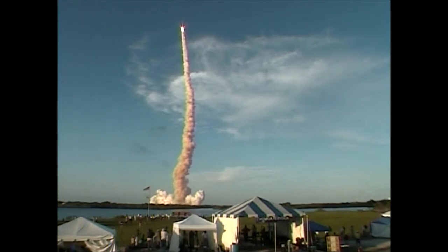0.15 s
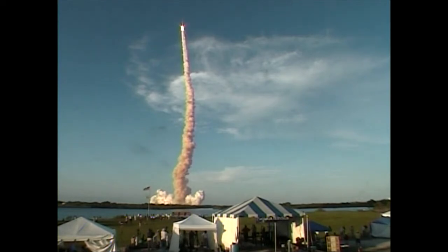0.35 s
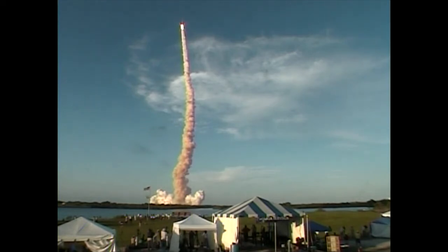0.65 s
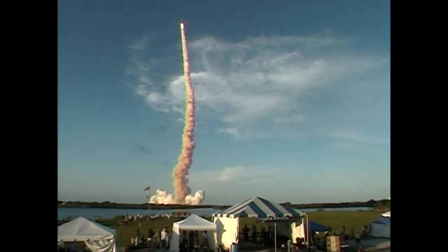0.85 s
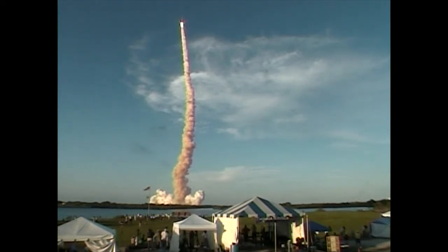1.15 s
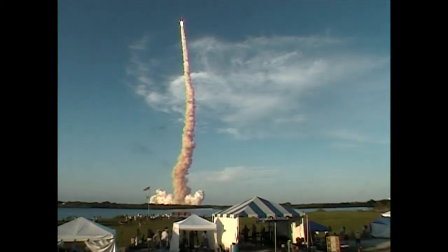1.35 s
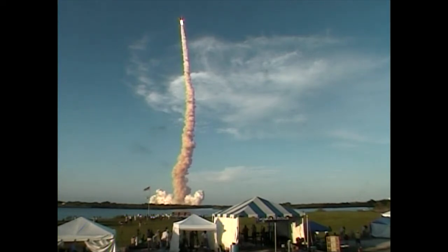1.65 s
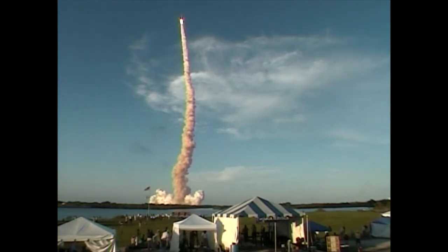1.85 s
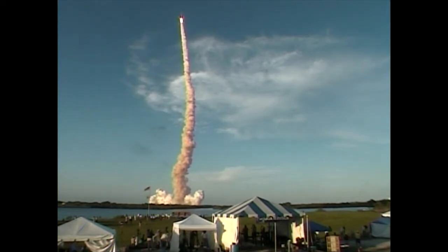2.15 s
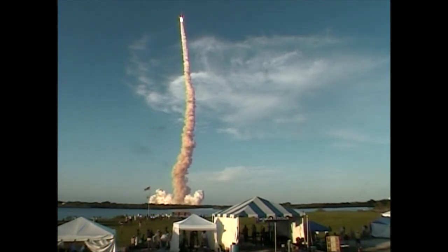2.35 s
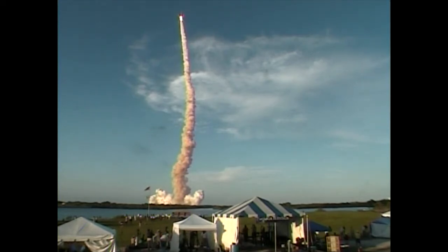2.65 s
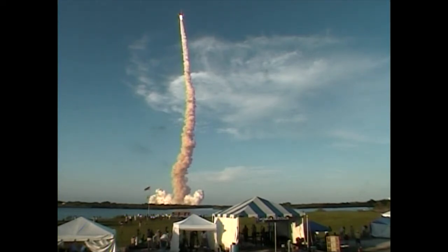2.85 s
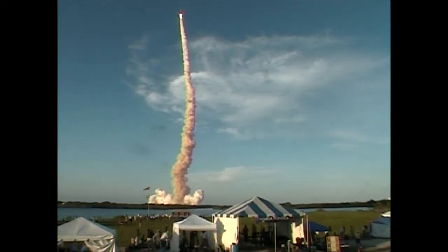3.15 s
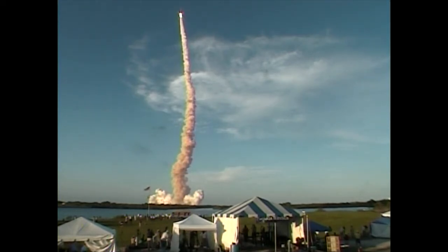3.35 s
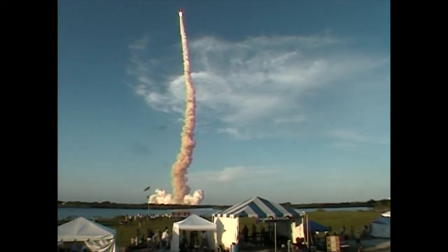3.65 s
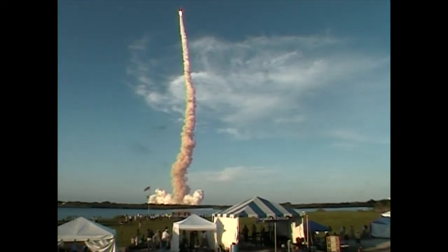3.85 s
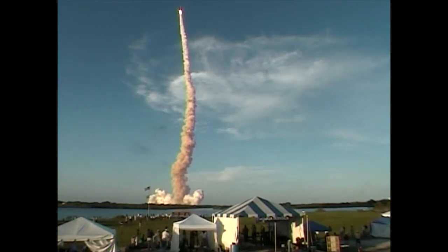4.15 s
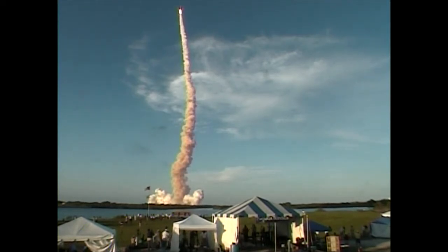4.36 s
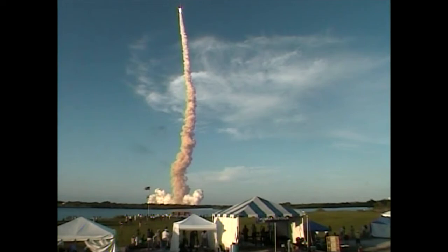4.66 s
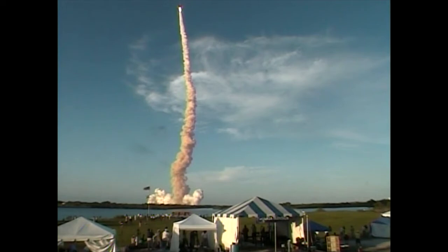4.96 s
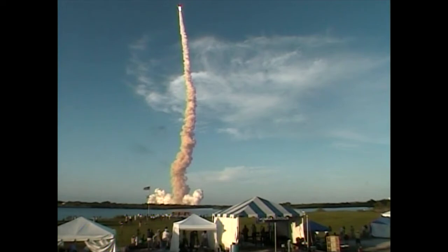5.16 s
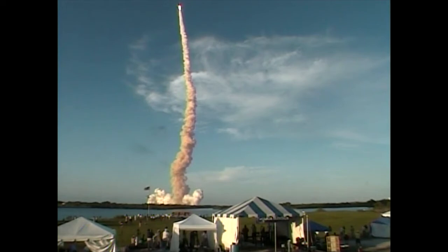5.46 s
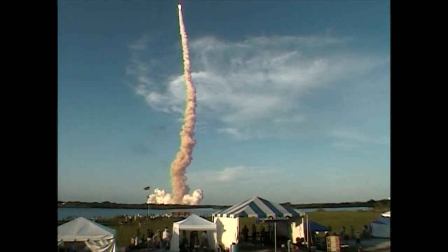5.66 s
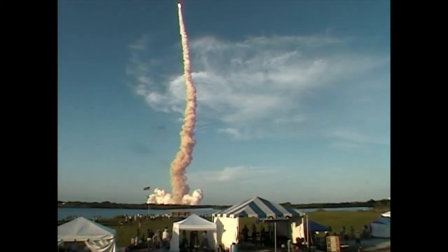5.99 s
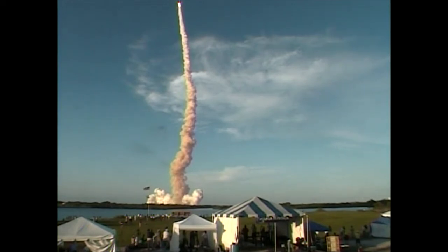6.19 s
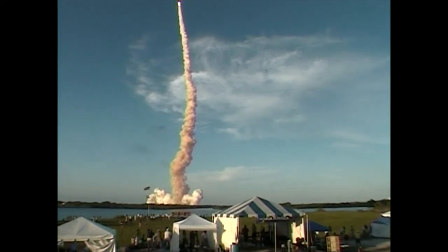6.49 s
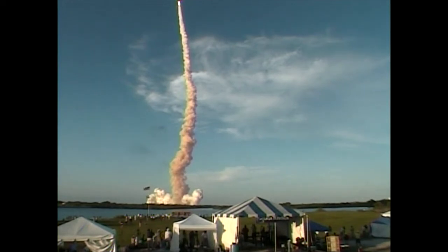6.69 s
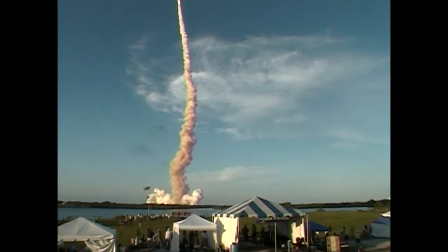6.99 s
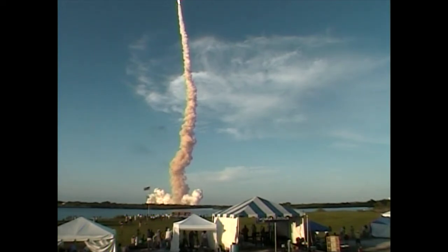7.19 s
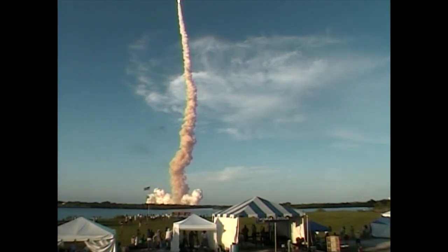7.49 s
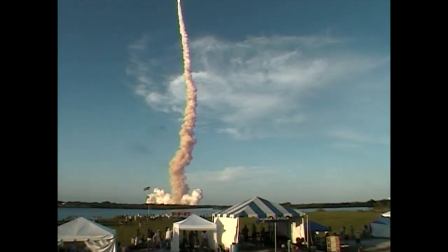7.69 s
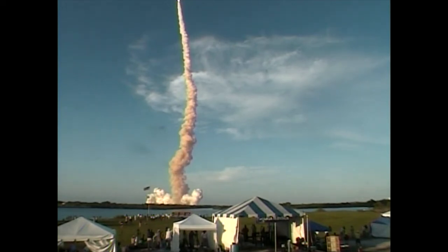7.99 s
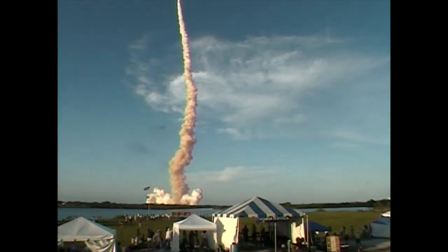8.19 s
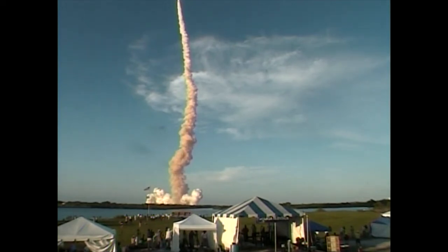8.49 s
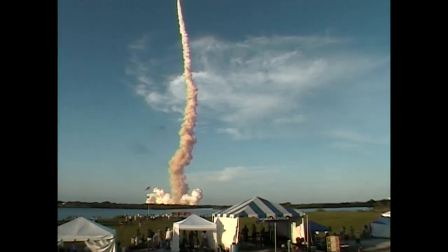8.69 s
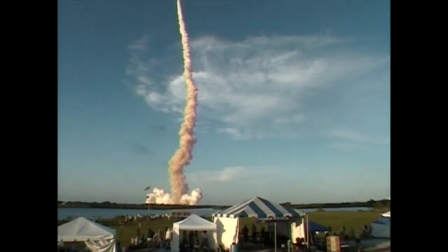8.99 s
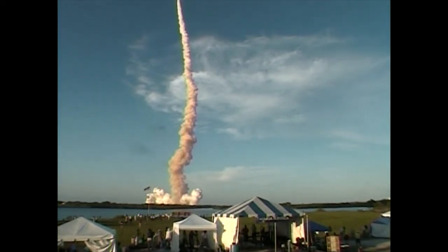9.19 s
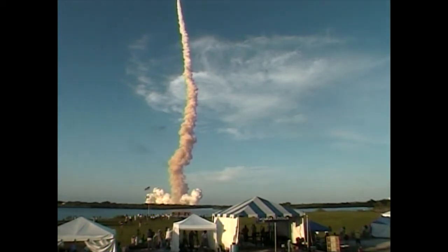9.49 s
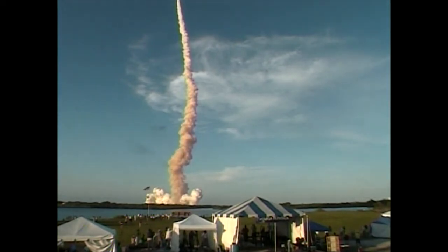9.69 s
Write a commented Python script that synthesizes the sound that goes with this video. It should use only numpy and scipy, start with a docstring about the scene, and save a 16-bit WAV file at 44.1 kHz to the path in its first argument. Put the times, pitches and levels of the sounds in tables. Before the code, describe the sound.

A distant rocket climbing: one hard opening crack, then nonstop ragged tearing crackle over soft roar and low rumble, densest near three and a half seconds.

```python
"""A hard crack comes first, then a torn crackle over a soft roar and a low rumble: a rocket climbs miles away.
The exhaust sends shock fronts, made here as pressure jumps that snap back; its roar and rumble are
coloured noise. Echoes with sliding delays and a short scattered tail, as from tents and people, follow.
The camera's microphone flattens the tallest peaks; a thin whine, a faint whirr and hiss lie underneath,
and a high noisy fizz swells with bright, loud sound and lingers."""
import sys
import numpy as np
from scipy import signal
from scipy.fft import rfft, irfft, next_fast_len
from scipy.io import wavfile
from scipy.ndimage import uniform_filter1d

SR = 44100
rng = np.random.default_rng(int(sys.argv[2]) if len(sys.argv) > 2 else 0)


def unload_wav(signal):
    """Save mono or channel-first audio to the path in sys.argv[1] as 16-bit WAV at rate SR, clipped to [-1, 1]."""
    wavfile.write(
        sys.argv[1],
        SR,
        np.round(np.clip(np.atleast_2d(signal).T, -1, 1) * 32767).astype(np.int16),
    )


N = 433944
TIME = np.arange(N) / SR

# the cracks that stand out: [t/s, pressure level/dB, steepness as treble/dB, strength of the tail/dB]
CRACKS = [(0.012, -4.5, 3.5, 4), (0.0736, -6.5, -1, 2.5), (0.0783, -10, 0, -9), (0.143, -6, -3.5, 1.5),
          (0.205, -13, -2, 5), (0.286, -17, -0.5, 1), (0.369, -17, -2.5, 8), (0.377, -10, -5, -4),
          (0.45, -8.5, 3, 2.0), (0.5211, -9, -0.5, -0.5), (0.548, -14.5, 3, 4.5), (0.5964, -10.5, 1.5, 3),
          (0.628, -10.5, 6, 4.5), (0.7187, -11.5, 2.5, 3.5), (0.768, -14.5, -1.5, 0), (0.802, -5.5, 3, 2.5),
          (0.874, -8.0, 2.5, 4), (0.941, -9, 1.5, 4), (1.0784, -16.0, -2, 5), (1.17, -12.5, -4.5, 0),
          (1.2134, -12, -1.5, 1.5), (1.284, -15.5, 0, 6), (1.3816, -3.5, 1.5, 0.5), (1.449, -12, -8, 4),
          (1.6454, -12, -7, 0), (1.6794, -11, -2, 4.5), (1.7554, -7.5, -0.5, 4), (1.8069, -16.5, -0.5, 9),
          (1.9398, -11.5, -8.5, -1.5), (1.9509, -10.5, 0, -1), (2.0368, -15, -0.5, 5.5),
          (2.173, -12.5, 0.5, 7), (2.223, -9.5, 0.5, 4.5), (2.2978, -8, 0.5, -0.5), (2.3475, -15.5, 3, 2.5),
          (2.4265, -7, 3.0, -2), (2.5629, -9, 1.5, -3), (2.6023, -17, 1, 2), (2.637, -8.5, 5, -4.5),
          (2.6981, -8.0, 4, 1.5), (2.716, -9.5, 4, -10), (2.7198, -13, 5, -11), (2.751, -6.5, 4.5, 2),
          (2.835, -8.5, -2.5, 1), (2.8678, -15, 0, 2.5), (2.899, -5.5, 2, -4), (2.9513, -13, 2, 0),
          (2.9856, -4.5, 4, -5.5), (3.0122, -6.5, 2.5, -7), (3.0723, -9.5, 1.5, 3),
          (3.116, -8.5, 0.5, -0.5), (3.1627, -6.5, 4, -2), (3.1933, -10, -7, -9), (3.2146, -4.5, 1, -1),
          (3.2387, -4.5, 1, -4), (3.265, -4.5, 2.5, -7), (3.322, -4, 1, -0.5), (3.374, -3.5, 3, -2),
          (3.3886, -6.5, 1.5, -4), (3.416, -3, 5.5, 4), (3.4668, -15, 5, -2), (3.489, -4.5, 3.5, -1),
          (3.5083, -2, 5, 1), (3.544, -8, 7, 1.5), (3.5756, -7.5, 9.5, 3.5), (3.6283, -7, 8, 3),
          (3.675, -3, 2.5, 2.5), (3.6925, -9, 7.5, 1.5), (3.761, -1.5, 5.5, 4.5), (3.798, -12, 10, 1.5),
          (3.819, 0, 2.5, 5), (3.8665, -9, 0.5, 4), (3.911, -6, 4.5, 4), (3.932, -6, -5.5, 2.5),
          (3.9703, -10.5, 2, 5.5), (4.0548, -10.5, -4, -2), (4.0837, -7.5, -5, 3.5), (4.1648, -4.5, 3.5, 1),
          (4.207, -12.5, -2, 3), (4.265, -6.5, 4.5, 6), (4.3335, -5.5, 5, 2), (4.409, -15, 1, 1),
          (4.431, -15.5, -1, 8), (4.462, -7, 5, -1.5), (4.515, -14.0, 0.5, 3.5), (4.5655, -13.5, 0.5, 5.5),
          (4.614, -10, 3, 5), (4.67, -13, -1.5, 6.5), (4.7426, -6.5, 4, 1), (4.7916, -11.5, 2, 1),
          (4.816, -14, 2.5, 5), (4.8953, -11.5, 1, 3), (4.9402, -12.5, -1, -1), (5.0147, -7.5, 4, 3),
          (5.121, -12.5, -1.5, 3), (5.2036, -6, 1, 1), (5.3085, -12.0, 0, 1.5), (5.3364, -9.5, -0.5, 5),
          (5.395, -10.5, -2, 3), (5.4643, -14, -5, 6.5), (5.5296, -14.5, -6.5, 4), (5.6719, -8, -5.5, -1),
          (5.745, -7, -5, 2.5), (5.794, -4.5, -2, 3.5), (5.8593, -5.5, -3.5, 2), (5.9238, -11.5, -6, 2.5),
          (6.015, -8.5, -7, 4), (6.072, -5.5, -2, -0.5), (6.118, -4.5, -3, 0.5), (6.2069, -11, -5, 3.5),
          (6.2622, -15, -6, 7), (6.3413, -4, -2.5, 2.5), (6.392, -5.5, 0.5, -0.5), (6.456, -4.5, 0.5, 1),
          (6.5138, -9, 0, 3.5), (6.6226, -5.5, 6, 1.5), (6.6719, -14, 4.5, 2.5), (6.7205, -15.5, 1.5, 4),
          (6.795, -15, -2, 3), (6.9218, -11.5, 3, 1), (6.9715, -5.5, 4.5, -2), (7.0345, -5.5, 0.5, 1.5),
          (7.0715, -14, 3, 6), (7.119, -6, 3, 2.5), (7.201, -16, 1.5, 2), (7.3397, -6, 2.5, 1),
          (7.426, -5, 1.5, 1.5), (7.4719, -13, 2, 1.5), (7.554, -8, -3, -1), (7.5833, -12, 5, 0),
          (7.6243, -13, 0, -1), (7.6449, -9, -4, 2.5), (7.716, -5, 0.5, 3), (7.745, -9.5, 0.5, 1.5),
          (7.8158, -5.5, 5, 0.5), (7.977, -15, -6, 2), (8.038, -17.5, -4, 6.5), (8.083, -7, -4.5, 6),
          (8.1151, -9, 2, 2), (8.1834, -8.5, -2, 1), (8.2359, -9.5, -2, 2.5), (8.314, -12.5, -3.5, 3),
          (8.3539, -7.5, 1.5, 4.5), (8.4704, -9.5, -3, 3), (8.51, -7, -1.5, 1.5), (8.566, -9, -4, 1),
          (8.5797, -9.5, 6, -0.5), (8.637, -8.5, -2, 4), (8.8455, -12.5, -2, 0.5), (8.918, -9, -3.5, 2),
          (9.0527, -8.0, 2, 1.5), (9.1252, -12.5, -6.5, 2.5), (9.206, -10, -3.5, 0.5),
          (9.268, -6, 1.5, 1.0), (9.405, -5.5, 2.0, -2.5), (9.454, -6, 3, -1), (9.4976, -12, -1.5, -5),
          (9.5634, -11, 3.5, 2.5), (9.622, -8, 3, -2), (9.636, -11, 2, 3), (9.6617, -5.5, 5, -3),
          (9.7558, -11, 6, -3), (9.822, -11.5, -2, 3)]
# the roar between the strong fronts, before each layer's own level: [t/s, level/dB]
ROAR_LEVEL = [(0.0, -33), (0.3, -35), (0.74, -33), (1.23, -35), (2.27, -30.5), (2.49, -33), (3.7, -26.5),
              (5.21, -35), (5.86, -29), (6.8, -30.5), (7.35, -30.5), (7.89, -34.5), (8.38, -31.5),
              (8.82, -31.5), (9.84, -29)]
# low rumble of the plume, before its layer level: [t/s, level/dB]
RUMBLE_LEVEL = [(0.0, -59), (0.3, -54), (2.11, -45), (3.3, -56), (4.3, -56), (4.7, -48.5), (6.6, -49.5),
                (7.2, -47), (7.8, -52), (8.8, -44), (9.84, -47.5)]
# what changes as the plume turns: [t/s, bass/dB, treble of the roar/dB, scatter from the tents/dB]
PLUME_TONE = [(0, -4, 4, -1), (1.3, -2, 3.5, 0.5), (2.4, -3.5, 3, 3.5), (3.0, -2.5, 1, -1.5),
              (3.6, -11, 0.5, -7), (4.3, -0.5, 0.5, -4), (5.0, 2, 3.5, 0.5), (5.9, -4.5, -2, -2.5),
              (6.6, -5.5, -3.5, -6.5), (7.3, -8, -1, -3), (8.7, -1.5, 0, -2.5), (9.84, -7, -4.5, -3)]
# colour of one front after the air and the microphone, relative: [f/Hz, level/dB]
FRONT_COLOUR = [(25, -9.5), (70, -10.5), (125, -1.5), (185, -1.5), (270, -1.5), (420, -0.3), (700, -5),
                (1000, -8.5), (2200, -20), (3000, -30.5), (3800, -38), (4700, -51.5), (11000, -68.5),
                (14000, -76)]
# colour of the rumble noise, relative: [f/Hz, level per Hz/dB]
RUMBLE_SPECTRUM = [(10, -12.5), (25, -4), (38, -5), (56, 3), (72, -4.5), (110, 8), (200, -13), (600, -88)]
# colour of the roar noise, relative: [f/Hz, level per Hz/dB]
ROAR_SPECTRUM = [(60, -18.5), (120, 1), (180, -0.5), (250, 3.5), (520, -2.5), (1000, -10), (2000, -19),
                 (3000, -31), (3800, -35), (4700, -53), (12000, -70)]
# colour of the fizz noise, relative: [f/Hz, level per Hz/dB]
FIZZ_SPECTRUM = [(2000, -16), (4500, 0.5), (6000, 10.5), (8000, 5.5), (11000, -2.5), (15000, -8.5),
                 (17000, -33.5)]
# reflections: [delay at the start/ms, delay at the end/ms, level at the start/dB, level at the end/dB,
# bass edge f/Hz, treble edge f/Hz]
REFLECTIONS = [(5.67, 8.45, -12.5, -2, 11, 680), (22.19, 23.99, -6.5, -0.5, 110, 1290),
               (6.195, 5.7, -3, -22, 66, 3900), (5.905, 5.7, -9.5, -11.5, 3200, 12000),
               (4.46, 4.77, -11.5, -10, 330, 810), (16.37, 15.97, -10, -10.5, 1300, 1000),
               (2.235, 2.23, -11, -18, 220, 8800)]


def gain_of(db):
    """Turns decibels into a gain."""
    return 10 ** (np.asarray(db) / 20)


def evened(x):
    """Scales a signal to an average strength (rms) of 1."""
    return x / np.sqrt(np.mean(x ** 2) + 1e-20)


def read(points, hz):
    """Reads a spectrum table at any frequency, on a log-frequency axis."""
    f, value = np.transpose(points)
    return np.interp(np.log(hz + 1), np.log(f + 1), value)


def follow(rows):
    """Draws each column of a time table as a curve with a value at every sample."""
    s, *columns = np.transpose(rows)
    return [np.interp(TIME, s, column) for column in columns]


def band(x, hz, kind, order=2):
    """Keeps the lows, the highs or a band, looking only at the past."""
    return signal.sosfilt(signal.butter(order, hz, kind, fs=SR, output="sos"), x)


def colour(x, points, size=4096):
    """Gives a sound the table's spectrum; a click of 1 comes out with a peak of 1."""
    log_gain = np.log(gain_of(read(points, abs(np.fft.fftfreq(size, 1 / SR)))))
    # minimum phase: the filter answers as early as it can
    spectrum = np.exp(np.conj(signal.hilbert(log_gain)))
    taps = np.fft.ifft(spectrum).real[:size // 2]
    return signal.oaconvolve(x, taps / abs(taps).max())[:N]


def dulled(x, hz):
    """Takes the treble off without delay."""
    size = next_fast_len(N)
    loss = 1 + (np.fft.rfftfreq(size, 1 / SR) / hz) ** 4
    return irfft(rfft(x, size) / loss, size)[:N]


def phase_turn(x, hz):
    """An all-pass: the microphone's bass lag makes every pressure step overshoot."""
    r = np.exp(-2 * np.pi * hz / SR)
    return signal.lfilter([r, -1], [1, -r], x)


def camera_whine(whine_db=-84.5, throb=.4, throb_hz=12, whirr_db=-86.5, jitter_hz=100,
                 hiss_db=-82, hiss_top_hz=14500):
    """The camera's own noise: a thin throbbing whine, a faint pulsing whirr of unsteady pitch, and hiss."""
    whine_hz, whirr_hz, pulses_hz = 15734, 12140, 30
    throbbing = 1 + throb * np.sin(2 * np.pi * throb_hz * TIME)
    whine = np.sin(2 * np.pi * whine_hz * TIME) * throbbing
    pulsing = (1 + np.sin(2 * np.pi * pulses_hz * TIME)) ** 2
    jitter = evened(dulled(rng.standard_normal(N), 25))
    whirr = pulsing * np.sin(2 * np.pi * np.cumsum(whirr_hz + jitter_hz * jitter) / SR)
    hiss = gain_of(hiss_db) * dulled(rng.standard_normal(N), hiss_top_hz)
    return gain_of(whine_db) * evened(whine) + gain_of(whirr_db) * evened(whirr) + hiss


def rumble(level_db=3):
    """The largest eddies of the plume, as deep noise that swells and sinks."""
    db, = follow(RUMBLE_LEVEL)
    return gain_of(db + level_db) * evened(colour(rng.standard_normal(N), RUMBLE_SPECTRUM))


def roar(level_db=-6.5, flutter_db=5.0, flutter_hz=22, treble_hz=1100):
    """The turbulent jet's soft, fluttering roar, as noise of uneven loudness."""
    (db,), (_, treble_db, _) = follow(ROAR_LEVEL), follow(PLUME_TONE)
    noise = evened(colour(rng.standard_normal(N), ROAR_SPECTRUM))
    flutter = np.tanh(evened(dulled(rng.standard_normal(N), flutter_hz)))  # it surges and sags within bounds
    body = dulled(noise, treble_hz)
    treble = gain_of(treble_db) * (noise - body)
    return gain_of(db + level_db + flutter_db * flutter) * (body + treble)


def fronts(at, size, steep_db, split_hz=1150, length_s=0.00065, length_spread_db=2.5, snap=0.18,
           snap_per_db=-0.03, shrink=0.9, sharp_db=-8, rounding=0.4, round_hz=3000):
    """Pressure jumps that snap back; steep ones are shorter and brighter, the air rounds weak ones."""
    stretch_db = length_spread_db * rng.uniform(-1, 1, len(at)) - shrink * steep_db
    back = at + np.round(length_s * SR * gain_of(stretch_db)).astype(int)
    recoil = np.clip(snap + snap_per_db * steep_db, 0, .8)
    where = np.clip(np.r_[at, back], 0, N - 1)
    bright = size * gain_of(steep_db)
    sharp = bright * np.minimum(size / gain_of(sharp_db), 1) ** rounding
    # the same clicks three times: weighted for the lows, the middle and the top
    body, edge, tip = (np.bincount(where, np.r_[-w, w * recoil], N) for w in (size, bright, sharp))
    clicks = tip + dulled(edge - tip, round_hz) + dulled(body - edge, split_hz)
    return colour(clicks, FRONT_COLOUR)


def stream(per_s=110, spread_db=5, level_db=-6.0, steep_db=-4.5, steep_spread_db=4):
    """Weak fronts, most too small to have steepened, flap at random moments."""
    (db,), (_, treble_db, _) = follow(ROAR_LEVEL), follow(PLUME_TONE)
    at = np.flatnonzero(rng.random(N) < per_s / SR)
    excess = np.minimum(rng.exponential(1, len(at)), 2)  # many small, few large
    shape = rng.uniform(-1, 1, len(at))
    steepness = treble_db[at] + steep_db + steep_spread_db * shape
    flapping = evened(fronts(at, gain_of(spread_db * excess), steepness))
    return gain_of(db + level_db) * flapping


def pops(per_s=26, over_roar_db=11.0, spread_db=3, steep_db=-3.5, steep_spread_db=4, bunch_s=0.009,
         trail_db=-4, count=2):
    """Middling fronts in small, loosely even bunches; they grow with the roar and brighten with its treble."""
    (db,), (_, treble_db, _) = follow(ROAR_LEVEL), follow(PLUME_TONE)
    bunches = int(per_s * N / SR)
    when, lag, size, shape = rng.random((4, count, bunches))
    place = np.arange(count)[:, None]  # place within the bunch
    s = (np.arange(bunches) + when[0]) / per_s + bunch_s * place * lag
    at = np.minimum(s * SR, N - 1).astype(int)
    size_db = db[at] + over_roar_db + trail_db * place + spread_db * (2 * size - 1.5)
    steepness = treble_db[at] / 2 + steep_db + steep_spread_db * (2 * shape - 1)
    return fronts(at.ravel(), gain_of(size_db).ravel(), steepness.ravel())


def lull(ahead_s=0.014, behind_s=0.019, depth_db=-5.0, soft_s=0.049):
    """Each crack has swallowed the weak waves around it: their gain at every sample."""
    near = np.zeros(N)
    for s, *_ in CRACKS:
        near[max(int((s - ahead_s) * SR), 0):int((s + behind_s) * SR)] = 1
    return gain_of(depth_db * uniform_filter1d(near, int(soft_s * SR) + 1))


def wakes(after_s=0.002038, within_s=0.018, drop_db=-16.0, growth=0.33, ragged=0.75, blooming=1.36,
          spread_db=3, steeper_db=3.0, count=3):
    """Small, steeper fronts trail each crack and make it tear, most behind strong or scattered ones."""
    s, db, steep, tail_db = np.transpose(CRACKS)[:, :, None]
    timing, luck = rng.random((2, len(CRACKS), count))
    delay = after_s + within_s * (np.arange(count) + timing) / count
    at = np.round((s + delay) * SR).astype(int)
    scatter_db = follow(PLUME_TONE)[2][(s * SR).astype(int)]
    size_db = db * (1 + growth) + drop_db + ragged * scatter_db + blooming * tail_db
    size = gain_of(size_db + spread_db * (2 * luck - 1))
    return fronts(at.ravel(), size.ravel(), np.repeat(steep + steeper_db, count))


def crackle(indirect=False):
    """The strong fronts as separate cracks; eddies weight the indirect paths, so some are dry, some bloom."""
    s, db, steep, tail_db = np.transpose(CRACKS)
    return fronts(np.round(s * SR).astype(int), gain_of(db + indirect * tail_db), steep)


def reflections(x, wander_ms=0.05, wander_hz=5):
    """Single echoes slide steadily as the rocket climbs and waver a little, so their comb sweeps the roar."""
    out, climb = np.zeros(N), TIME / TIME[-1]
    for first_ms, last_ms, first_db, last_db, low_hz, high_hz in REFLECTIONS:
        waver = wander_ms * evened(dulled(rng.standard_normal(N), wander_hz))
        delay = (first_ms + (last_ms - first_ms) * climb + waver) / 1000  # seconds
        # small surfaces miss the bass, soft ones the treble
        echo = dulled(band(x, low_hz, "high", order=1), high_hz)
        gain = gain_of(first_db + (last_db - first_db) * climb)
        out += gain * np.interp(TIME - delay, TIME, echo, left=0)
    return out


def scatter(x, t60=0.1, low_hz=160, high_hz=3200, turns_per_s=9, count=8):
    """Tents and people scatter a short tail (t60: seconds to fall 60 dB) whose pattern keeps changing."""
    out, t = np.zeros(N), np.arange(SR // 10) / SR
    onset = 1 - np.exp(-(t / .002) ** 2)
    x = dulled(band(x, low_hz, "high", order=1), high_hz)
    for k in range(count):
        tail = rng.standard_normal(len(t)) * gain_of(-60 * t / t60) * onset
        # the patterns take turns, each fading into the next
        share = np.sin(np.pi / 2 * np.minimum((TIME * turns_per_s - k) % count, 2))
        out += signal.oaconvolve(share * x, tail / np.linalg.norm(tail))[:N]
    return out


def scene(bass_hz=270):
    """Crackle and roar with their reflections and scattered tail, over the rumble."""
    bass_db, _, scatter_db = follow(PLUME_TONE)

    def with_bass(x):
        """Turns the bass up or down as the plume turns."""
        return x + (gain_of(bass_db) - 1) * dulled(x, bass_hz)

    small = wakes() + lull() * (pops() + stream() + roar())
    direct = with_bass(crackle() + small)
    indirect = with_bass(crackle(indirect=True) + small)
    scattered = scatter(indirect * gain_of(scatter_db))
    return (direct + reflections(indirect) + scattered + rumble())[None]


def fizz(sound, ceiling, fizz_db=-42.0, fizz_growth=1.516, fizz_fade_hz=26, fizz_linger=0.37, linger_hz=2.0,
         fizz_above_hz=1000, spit_db=-31, spit_growth=2.98, spit_fade_hz=500, fizz_brightening=0.61):
    """A high noisy fizz that swells with bright, loud sound, lingers after it and spits on its peaks."""
    # loudness of the bright sound, followed at three speeds
    power = 2 * band(sound, fizz_above_hz, "high") ** 2
    lasting, slow, quick = (np.sqrt(abs(band(power, hz, "low", order=1))) / ceiling
                            for hz in (linger_hz, fizz_fade_hz, spit_fade_hz))
    treble_db = follow(PLUME_TONE)[1]
    swelling = (slow + fizz_linger * lasting) ** fizz_growth
    swelling = gain_of(fizz_db + fizz_brightening * treble_db) * swelling
    spitting = gain_of(spit_db) * np.tanh(quick) ** spit_growth  # short bursts on the peaks
    return evened(colour(rng.standard_normal(N), FIZZ_SPECTRUM)) * (swelling + spitting)


def record(dry, dip_low_hz=3500, dip_high_hz=5200, dip=0.44):
    """The microphone flattens tall peaks and dulls the low treble; fizz and camera noise join, the top is cut."""
    ceiling, knee, lag_hz, top_hz = .45, 6, 170, 16300
    x = phase_turn(band(dry[0], 5, "high", order=1), lag_hz)
    x = x / (1 + abs(x / ceiling) ** knee) ** (1 / knee)
    x = x - dip * band(x, [dip_low_hz, dip_high_hz], "band", order=1)
    low_pass = signal.firwin(511, top_hz, window=("kaiser", 9), fs=SR)
    return signal.oaconvolve(x + fizz(dry[0], ceiling) + camera_whine(), low_pass, "same")[None]


dry = scene()
out = record(dry)
unload_wav(out)
```